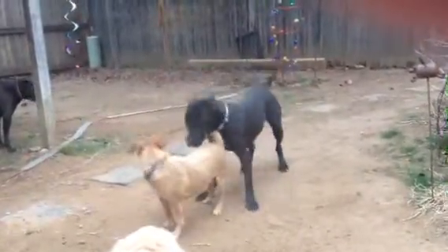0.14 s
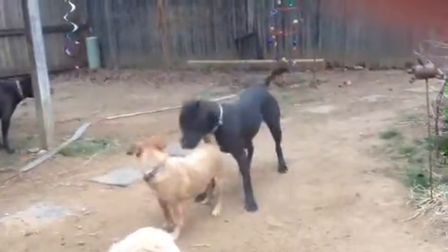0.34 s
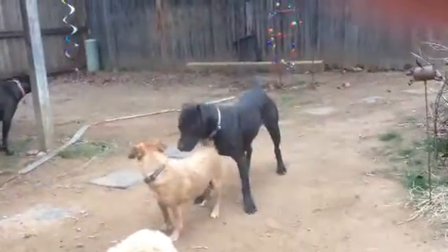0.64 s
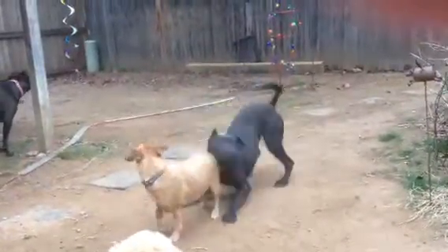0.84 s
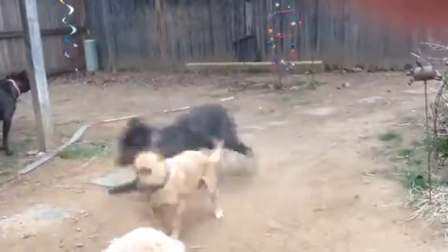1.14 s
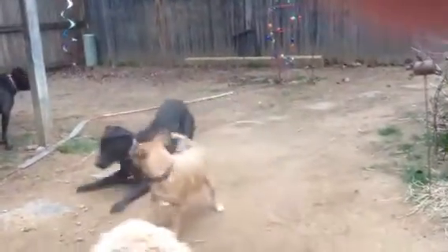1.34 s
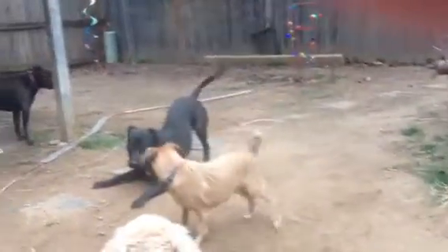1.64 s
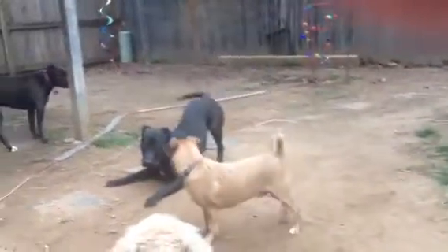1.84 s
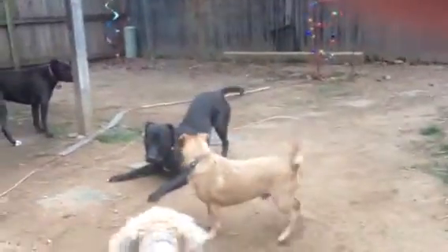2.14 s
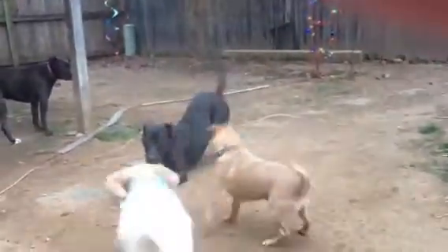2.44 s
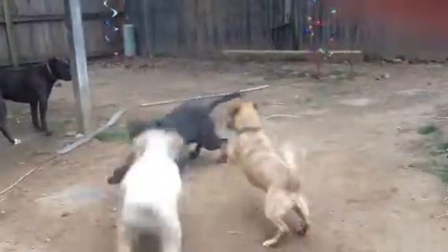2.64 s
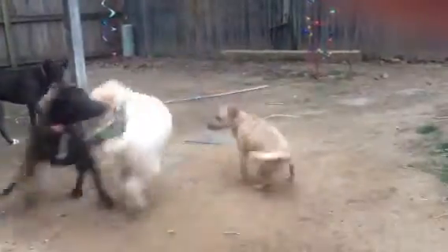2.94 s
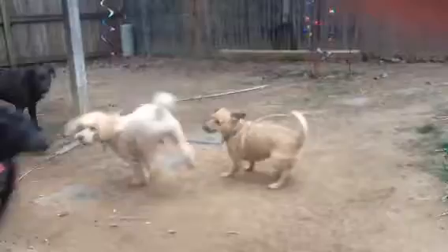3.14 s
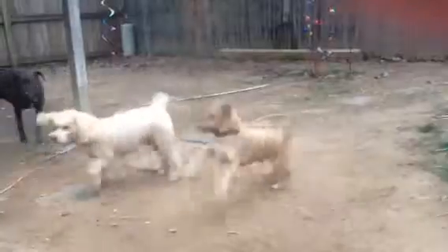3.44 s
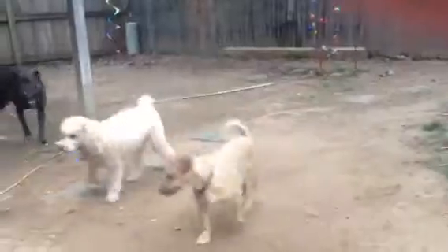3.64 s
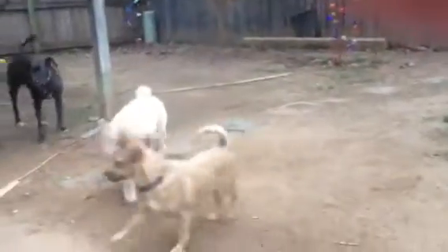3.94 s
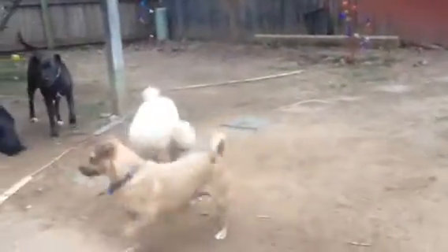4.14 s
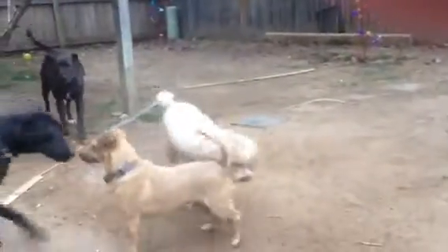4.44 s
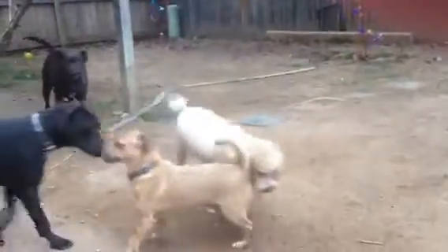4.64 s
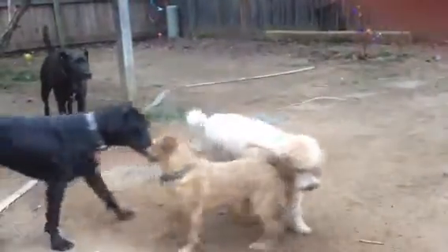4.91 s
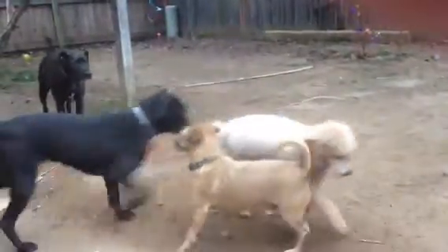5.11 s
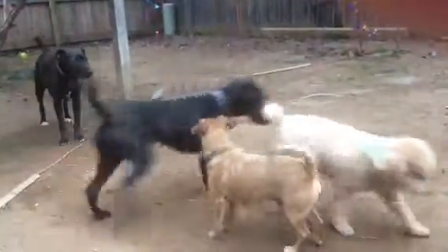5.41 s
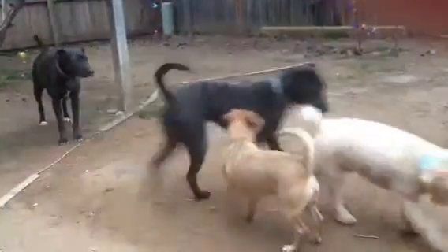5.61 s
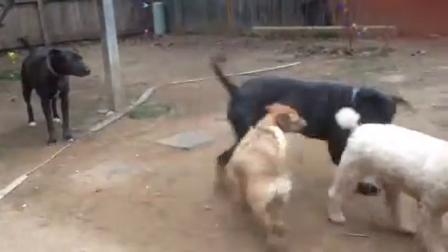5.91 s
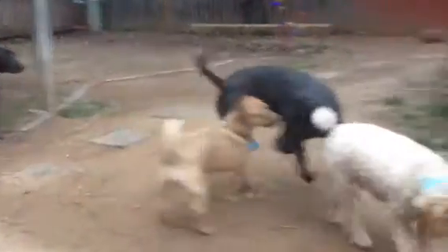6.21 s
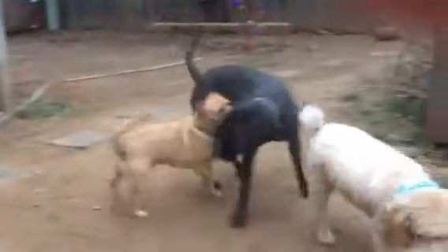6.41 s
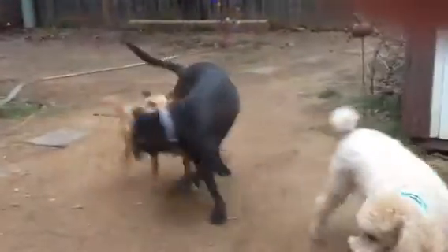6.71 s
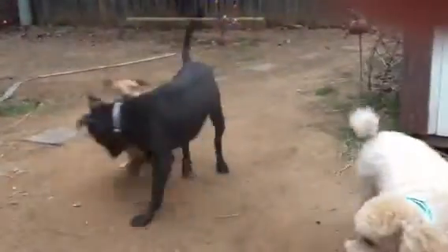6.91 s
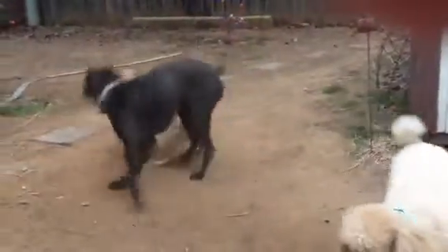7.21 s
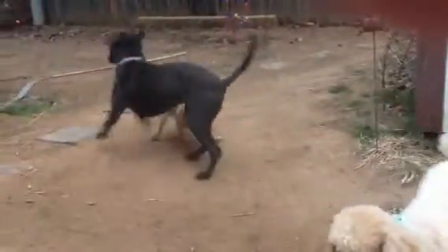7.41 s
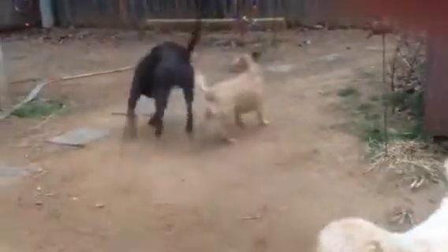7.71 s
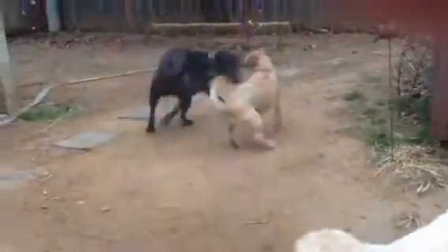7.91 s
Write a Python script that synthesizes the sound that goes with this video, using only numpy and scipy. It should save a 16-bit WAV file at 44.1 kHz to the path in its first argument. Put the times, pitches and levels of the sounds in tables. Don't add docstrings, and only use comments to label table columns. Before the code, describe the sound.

Outdoors in a fenced dirt yard, faint far traffic and a low mains hum lie beneath everything. From 0 to 2 s paws scrape the dry ground in short gritty bursts, with small thuds near 0.8 s and light collar tag ticks. At about 2 s comes a thin nasal whistle, then a small dog's sharp rising yip at 2.2 and wavering whines until 2.65, with soft answering wufs. Scuffling peaks; a big dog huffs and barks once, hoarse and loud, at 2.8-3.0, between two yaps, with heavy landings and bright jingles. Claws snap and tags clink until 3.8. Two high yelps follow at 4.1-4.4. After light scuffs, a hoarse yap over low wufs comes at 5.2-5.35. From 5.8 there are low huffing, faint whistles and a quiet grumble, with scrapes and snaps near 7 and 7.7. Short board echoes follow the calls.

```python
import sys
import numpy as np
from scipy import signal
from scipy.fft import rfft, irfft, next_fast_len
from scipy.io import wavfile
from scipy.ndimage import uniform_filter1d, map_coordinates

SR = 44100
rng = np.random.default_rng(int(sys.argv[2]) if len(sys.argv) > 2 else 0)


def inscribe(sig):
    pcm = np.round(np.clip(np.atleast_2d(sig).T, -1, 1) * 32767)
    wavfile.write(sys.argv[1], SR, pcm.astype(np.int16))


def how_loud(loudness_db):
    steps = np.asarray(loudness_db, float) / 20
    return 10 ** steps


N = 355446
TIME = np.arange(N) / SR

# (frequency [Hz], density [dB per Hz])
TRAFFIC = [(13, -79), (22, -55), (111, -5), (227, -2.5), (268, -6), (334, -6), (427, -14), (849, -11.5),
           (2760, -23), (3440, -30), (4410, -29), (5650, -25.5), (7850, -42.5), (15600, -34.5)]
TRAFFIC_DB = -58
# (frequency [Hz], level [dB])
HUM = [(120, -70), (240, -68)]
# (frequency [Hz], t60 [s])
FENCE_T60 = [(300, 0.24), (1200, 0.54), (3000, 0.46), (6000, 0.28), (12000, 0.69)]
# (frequency [Hz], level [dB])
FENCE_COLOUR = [(500, 2.5), (800, -2.5), (1400, -0.5), (2800, 0.5), (4200, 0.5), (8000, -3)]
# (delay [s], level [dB])
BOARDS = [
    (.005, -8),
    (.013, -7.5),
    (.027, -9.5),
    (.061, -18),
    (.098, -17),
]

# (start [s], hold [s], scrape level [dB], dust over scrape [dB])
SCUFFLE = [(0.076, 0.015, -64, -13), (.715, .03, -68, -14), (0.78, 0.075, -58, -10.5),
           (0.92, 0.073, -53, -11), (1.137, 0.2, -52, -11), (1.253, 0.17, -59.5, -4),
           (2.11, 0.032, -60, -23), (2.363, 0.193, -53.5, -12), (2.638, 0.43, -49.5, -14),
           (3.114, 0.18, -57, -8), (3.307, 0.15, -53.5, -8), (3.549, 0.045, -59, -7),
           (3.656, 0.062, -59.5, -10), (4.07, 0.26, -63, -12), (4.766, 0.1727, -66.5, -6.5),
           (4.947, 0.15, -65.5, -7), (6.054, 0.21, -68, -9.5), (6.422, 0.25, -70, -8.5),
           (6.724, 0.18, -62.5, -11), (7.007, 0.17, -60.5, -10), (7.247, 0.19, -59.5, -5),
           (7.728, 0.04, -49.5, -11.5), (1.65, 0.023, -65.5, -8), (7.984, 0.027, -58, -8.5)]
# (frequency [Hz], density [dB per Hz])
SCRAPE = [(530, -47.5), (900, -19.5), (963, -16.5), (1750, -14), (3860, -9.5), (4160, -7), (4540, -12.5),
          (5450, 1.5), (9000, -28.5), (11700, -56), (19800, -120)]
# (frequency [Hz], density [dB per Hz])
DUST = [(4120, -27), (7000, -18.5), (9060, -11.5), (13300, -6.5), (15100, -10), (15600, -6.5)]
SCUFF_RISE_DB_S, SCUFF_FALL_DB_S, SCUFF_IDLE_DB = 307, 124, -78.5
# (time [s], peak level [dB], frequency [Hz])
SNAPS = [(1.1473, -52, 5500), (2.52, -39, 5160), (3.1638, -31.5, 4164), (3.3251, -32.5, 3060),
         (3.5602, -30, 5670), (4.0756, -39.5, 4190), (4.761, -48.5, 5420), (5.233, -50, 4940),
         (6.2504, -54, 5470), (6.8438, -45, 5320), (7.0028, -29, 4380), (7.0025, -37, 5730),
         (7.011, -44, 4700), (7.018, -42.5, 5460), (7.2515, -41, 5280), (3.215, -40, 5600),
         (1.273, -39, 5600), (7.3842, -35, 5500), (7.7243, -38.5, 5900), (7.9853, -47, 5550),
         (2.463, -37.5, 5900), (2.6345, -27, 2830), (2.635, -28, 4295), (3.296, -42, 3100),
         (3.465, -43.5, 4960), (3.627, -40.5, 5600), (3.6502, -41.5, 5300), (3.7, -47, 6000),
         (3.7405, -36, 4940), (3.768, -49.5, 5350), (4.109, -43, 5620), (5.347, -46, 4900),
         (5.528, -55, 3500)]
SNAP_T60_S = 0.033
# (time [s], peak level [dB], frequency [Hz], t60 [s])
BUCKLE = [
    (1.089, -52, 6600, .15),
    (7.73, -45, 6620, .35),
    (2.666, -38, 6520, .06),
    (3.572, -50, 4800, .2),
    (3.362, -49, 3830, .1),
    (3.345, -46, 2270, .08),
]
# (time [s], peak level [dB], frequency [Hz])
THUDS = [(0.788, -40, 233), (0.915, -44, 166), (2.576, -41.5, 234.7), (2.668, -41.5, 258),
         (2.798, -25.5, 311), (2.97, -32, 311.6), (2.799, -38, 176.9), (2.975, -43, 178),
         (3.36, -41.5, 160), (3.321, -41.5, 270), (4, -54, 228)]

# (frequency [Hz], level [dB], t60 [s])
TAG = [
    (5720, 5, 0.0882),
    (9920, -5.5, 0.045),
    (13220, -7.5, 0.099),
    (14700, -11, 0.15),
]
# (time [s], peak level [dB], struck mode [Hz], low click [dB], ring [dB])
TAG_HITS = [(.768, -52, 9920, -5, -0.5), (0.9263, -53.5, 14700, 0.5, 8), (1.09, -48.5, 13220, -11, -3),
            (1.1174, -44.5, 13220, -12, 4), (1.3682, -43, 13220, -7, -0.5), (2.5868, -42.5, 14700, 4.5, -1),
            (2.6674, -47.5, 13220, 27, -12.5), (2.807, -36, 13220, -0.5, -1), (2.825, -34.5, 14700, 0, 1),
            (2.997, -40.5, 9920, -11.5, 10), (2.9751, -30, 13220, 17.5, 7), (3.0782, -45, 13220, -13, 3.5),
            (3.1356, -40, 9920, -1.5, 1), (3.188, -48.5, 9920, 17, 7), (3.214, -41, 9920, 13, -5.5),
            (3.9787, -44, 13220, 14, -5), (5.576, -48, 14700, 7, -4), (6.7357, -44, 9920, -6, -0.5),
            (7.2497, -49, 13220, 5.5, 5.5), (7.7249, -60, 14700, 5.5, -12), (7.881, -50, 13220, -10, 1)]
# (time [s], peak level [dB], frequency [Hz], low click [dB])
CLINKS = [(1.275, -49, 10500, 23), (1.479, -46.5, 10400, -15), (2.4612, -48, 10800, 25.5),
          (2.6328, -34.5, 15060, 14.5), (2.7633, -39.5, 10230, -3), (2.811, -35, 10980, -1.5),
          (2.82, -32.5, 10240, -8), (2.822, -32, 11710, -8), (2.832, -29.5, 10220, -7),
          (2.834, -31, 14410, -7), (2.765, -40, 11770, -9), (3.018, -40, 13180, -8), (3.34, -40, 12850, 16),
          (3.5646, -35, 10500, 5), (3.65, -46, 10200, 7.5), (3.723, -51, 12000, 3.5),
          (3.7402, -35.5, 11350, -7), (3.9352, -43, 13000, -17.5), (7.002, -63, 10470, 12),
          (7.3622, -38.5, 11770, -6), (7.4934, -48, 13100, -16.5)]
RATTLES_PER_S, RATTLE_DB, RATTLE_WIDTH_HZ = 30, -1, 80

# (peak time [s], rise [s], fall [s], chest level [dB], mouth over chest [dB])
HUFFS = [
    (2.81, 0.036, 0.0048, -32.5, -6),
    (3.346, 0.028, 0.078, -44.5, 2.5),
    (5.799, 0.24, 0.16, -54, -22),
    (7.169, 0.48, 0.77, -63, -9.5),
]
# (frequency [Hz], width [Hz], level [dB])
HUFF_THROAT = [
    [(356.7, 170, -1.5), (189, 61, -2)],
    [(624, 90, 5.5), (966, 114.5, 5.5), (2214, 200, 6)],
]
HUFF_EDGE_DB = -6

# (time [s], effort [dB])
BARK = [
    (2.774, -55.5),
    (2.814, -25),
    (2.84, -16.5),
    (2.858, -12),
    (2.901, -16),
    (2.941, -17.5),
    (2.971, -28),
    (3.005, -39.5),
    (3.03, -53),
]
# (frequency [Hz], width [Hz], level [dB])
BARK_THROAT = [
    [(777.5, 32.3, 8.5), (650, 130, -15)],
    [(1388, 150, 4.5), (1690, 190, -11)],
    [(1037, 100, 6.5), (1190, 166, 5)],
    [(2212, 530, 16.5), (2800, 1300, 3)],
    [(3560, 440, 11), (5100, 1000, 11), (5900, 390, 17), (14490, 1900, 0)],
]
# (level at peak [dB], slope [dB per s])
BARK_SHUTS = [
    (1, 12.5),
    (-5.5, -91),
    (-5, -24),
    (-9, -23.5),
    (-14, -260),
]
BARK_GLIDE = [0, -1.1, -1.4, -1.3, 0.14]
BARK_PEAK_S = 2.8614

# (start [s], length [s], pitch [Hz], level [dB])
WUFS = [
    (2.381, .1, 740, -35.5),
    (2.631, .07, 638, -50.5),
    (5.2, 0.15, 960, -44.5),
    (5.25, .085, 650, -47),
]
WUF_RISE, WUF_HOLD = 0.26, 0.4
WUF_SAG, WUF_START_DB, WUF_END_DB, WUF_MOUTH_DB = 0.93, -13.5, -11.5, -13.5

# (start [s], length [s], top [Hz], level [dB])
WHISTLES = [
    (2.02, .11, 3520, -72),
    (3.56, .24, 3490, -71),
    (5.93, .33, 3500, -67),
    (6.62, .31, 3510, -66),
]
ARCH_TOP, ARCH_START, ARCH_END, ARCH_DB = 0.35, 0.95, 0.94, -7
# (time [s], frequency [Hz], level [dB])
SECOND = [
    (4.094, 2030, -54),
    (4.108, 2190, -33.5),
    (4.135, 2043, -40),
    (4.158, 1880, -36),
    (4.185, 1893, -47),
]

# (time [s], pitch [Hz], level [dB], mouth opening [dB], cycle alternation [dB])
YIP = [
    (2.174, 1096, -50, -8.5, -35),
    (2.19, 1380, -39.5, 5, -40),
    (2.207, 1520, -28.5, -2.5, -50),
    (2.232, 1606, -23.5, -21, -47),
    (2.278, 1647, -34.5, -22, -57),
]
WHINE_UP = [
    (2.284, 1068, -45.5, -26, -25.5),
    (2.306, 937, -40, -8.5, -34),
    (2.336, 1128, -37, -2, -33.5),
    (2.385, 1227, -32, -12, -15),
    (2.405, 1283, -24, -18.5, -15),
    (2.445, 1296, -34.5, -24, -9),
    (2.463, 1179, -33.5, -14.5, -20.5),
]
WHINE_ON = [
    (2.464, 1101, -27.5, -13.5, -28.5),
    (2.495, 977.4, -34, -22, -32),
    (2.523, 997, -39, -29.5, -33.5),
    (2.552, 1090, -20.5, -31, -37),
    (2.562, 1169, -35, -8.5, -34.5),
    (2.6, 1248, -29, -16, -37.5),
    (2.621, 1163, -31.5, -13.5, -34.5),
    (2.632, 972, -41.5, -17.5, -27),
    (2.66, 617, -52, -30.5, -19),
]
YAP_IN = [
    (2.765, 1200, -48.5, -8, -16),
    (2.784, 1376, -47.5, 0.5, -18),
    (2.8, 1475, -28.5, -13.5, -9.5),
]
YAP_OUT = [
    (2.985, 1200, -36, -10, -9.5),
    (3.016, 1260, -22.5, -14, -15),
    (3.045, 1300, -43, -10.5, -14),
]
YELP = [
    (4.082, 761, -32.5, -28, -30),
    (4.096, 1000, -36, -16, -35),
    (4.106, 1130, -34.5, -4, -30),
    (4.119, 1248, -29, -6.5, -29),
    (4.147, 1349, -23, -16.5, -17),
    (4.171, 1325, -37, -16, -19),
    (4.192, 1316, -34, -27, -26),
    (4.22, 850, -40, -22, -28),
    (4.244, 775, -47, -19, -25),
]
YELP_AGAIN = [
    (4.252, 821, -41, -20, -23),
    (4.284, 1039, -34, -16, -46),
    (4.322, 1190, -23.5, -27.5, -25.5),
    (4.344, 1275, -33, -22, -4),
    (4.381, 1092, -33.5, -32, -28),
    (4.391, 1052, -38, -20, -20),
]
YAP = [
    (5.232, 743, -57, -24, -12),
    (5.258, 1011, -46.5, -7, -7.5),
    (5.285, 1282, -32, -14.5, -1),
    (5.305, 1386, -28, -11, -13.5),
    (5.327, 1394, -26, -9.5, -34),
    (5.345, 1398, -40, 9, -33),
]
# (time [s], roughness [0-1])
ROUGH = [(2.17, .4), (2.2, .42), (2.23, .08), (2.3, .18), (2.42, .3), (2.5, .15), (2.6, .3), (2.8, .5),
         (3.0, .3), (4.08, .3), (4.13, .3), (4.17, .6), (4.26, .45), (4.31, .15), (4.36, .5), (5.24, .9),
         (5.285, .7), (5.31, .28)]
# (overtone frequency [Hz], level [dB])
MUZZLE = [(1500, 0), (2750, 4), (3150, -8.5), (3500, -14), (4000, -11), (5400, -9.5), (6300, -24.5),
          (15000, -49)]
DULL_DB, FULL_DB = 1.33, -30
ODD_DB = -4.5

def unit(x):
    return x / np.sqrt(np.mean(x ** 2) + 1e-20)


def along(points, hz):
    f, v = np.transpose(points)
    return np.interp(np.log(hz + 1), np.log(f + 1), v)


def curves(tables, fade_s=.004):
    s, *cols = np.vstack(tables).T
    gate = 0
    for rows in tables:
        inside_s = np.minimum(TIME - rows[0][0], rows[-1][0] - TIME)
        gate = gate + np.clip(inside_s / fade_s + .5, 0, 1)
    return [np.minimum(gate, 1)] + [uniform_filter1d(np.interp(TIME, s, c), size=300) for c in cols]


def wobble(rate_hz):
    knots = rng.standard_normal(int(N * rate_hz / SR) + 4)
    coarse = TIME[::16]
    return np.interp(TIME, coarse, map_coordinates(knots, [coarse * rate_hz]))


def filtered(x, response):
    m = next_fast_len(N + 8192)
    return irfft(rfft(x, m) * response(np.fft.rfftfreq(m, 1 / SR)), m)[:N]


def modes(peaks):
    def response(f):
        total = 0
        for k, (c, w, db) in enumerate(peaks):
            total = total + (-1) ** k * how_loud(db) * 1j * f * w / (c * c - f * f + 1j * f * w)
        return total
    return response


def noise(spectrum, patchy_db, grit_db):
    grit = rng.exponential(size=N // 32 + 1).repeat(32)[:N]
    raw = rng.standard_normal(N) * how_loud(grit_db * grit)
    z = signal.stft(raw, nperseg=512)[2]
    patches = uniform_filter1d(uniform_filter1d(rng.standard_normal(z.shape), 8, 0), 8, 1)
    patchy = signal.istft(z * how_loud(patchy_db * unit(patches)), nperseg=512)[1][:N]
    return unit(filtered(patchy, lambda hz: how_loud(along(spectrum, hz))))


def add(out, s, sound):
    part = out[round(s * SR):][:len(sound)]
    part += sound[:len(part)]


def yard():
    hum = 0
    for hz, db in HUM:
        hum = hum + 1.37 * how_loud(db + 0.83 * wobble(16.0)) * np.sin(2 * np.pi * hz * TIME)
    traffic = noise(TRAFFIC, patchy_db=1.0, grit_db=-1.5)
    return how_loud(TRAFFIC_DB + 0.27 * wobble(11.0)) * traffic + hum


def fences(x):
    hz, t, z = signal.stft(rng.standard_normal(SR), SR, nperseg=256)
    decay_db = along(FENCE_COLOUR, hz)[:, None] - 60 * t / along(FENCE_T60, hz)[:, None]
    tail = signal.istft(z * how_loud(decay_db), SR, nperseg=256)[1]
    tail = np.pad(how_loud(-2.5) * tail / np.linalg.norm(tail), (900, 0))
    for k, (s, db) in enumerate(BOARDS):
        tail[round(s * SR)] += (-1) ** k * how_loud(db)
    return signal.fftconvolve(x, tail)[:N]


def scuffs():
    s, hold, db, dust_db = np.transpose(SCUFFLE)[..., None]
    t = TIME[::64]
    rise_db = SCUFF_RISE_DB_S * np.maximum(s - t, 0)
    fall_db = SCUFF_FALL_DB_S * np.maximum(t - s - hold, 0)
    each_db = db - rise_db - fall_db
    gains = []
    for over_db, idle in [(0, 1), (dust_db, .25)]:
        scuffing = np.linalg.norm(how_loud(each_db + over_db), axis=0)
        gains.append(np.interp(TIME, t, np.hypot(scuffing, how_loud(SCUFF_IDLE_DB) * idle)))
    return gains


def rattle(stir):
    touches = (rng.random(N) < RATTLES_PER_S / SR) * rng.standard_normal(N)
    tag = modes([(hz, RATTLE_WIDTH_HZ, db) for hz, db, _ in TAG])
    return how_loud(RATTLE_DB) * stir * unit(filtered(touches, tag))


def snaps(out):
    t = np.arange(SR // 3) / SR
    for s, db, hz, t60 in [(*row, SNAP_T60_S) for row in SNAPS] + BUCKLE:
        band = signal.butter(3, [.8 * hz, 1.45 * hz], "band", fs=SR)
        crack = how_loud(6 - 60 * t / .04) * signal.lfilter(*band, rng.standard_normal(len(t)))
        tone = .7 * np.sin(2 * np.pi * hz * t)
        add(out, s, how_loud(db - 3 - 60 * t / t60) * (tone + crack))


def thuds(out):
    t = np.arange(SR // 3) / SR
    push = how_loud(-60 * t / 0.14) * (1 - np.exp(-t / 0.0034))
    for s, db, hz in THUDS:
        add(out, s, how_loud(db) * push * np.sin(2 * np.pi * hz * t))


def paws():
    scrape, dust = scuffs()
    stir = how_loud(2 * wobble(25))
    out = stir * scrape * how_loud(1.5) * noise(SCRAPE, patchy_db=2, grit_db=2.0)
    out += stir * dust * how_loud(1.1) * noise(DUST, patchy_db=1.5, grit_db=2.2)
    out += rattle(dust)
    snaps(out)
    thuds(out)
    return out


def tag_ring(t, struck_hz):
    ring = 0
    for f, level_db, t60 in TAG:
        scatter, beat = rng.standard_normal(2)
        far_db = 6 * (abs(struck_hz / f - 1) > .08)
        decay = how_loud(level_db + 3 * scatter - 60 * t / t60 - far_db)
        ring = ring + decay * np.sin(2 * np.pi * f * t) * np.cos(2 * np.pi * 14 * beat * t)
    return ring


def collars():
    out, t = np.zeros(N), np.arange(SR // 5) / SR
    click_band = signal.butter(1, [3800, 7000], "band", fs=SR)
    for s, db, hz, low_db, *ring_db in TAG_HITS + CLINKS:
        if ring_db:
            ring = how_loud(ring_db[0]) * tag_ring(t, hz)
        else:
            ring = 2 * how_loud(-13 - 60 * t / 0.0437) * np.sin(2 * np.pi * hz * t)
        crack = how_loud(-9 - 60 * t / .012) * np.diff(rng.standard_normal(len(t)), prepend=0)
        click = signal.lfilter(*click_band, rng.standard_normal(len(t)))
        low = how_loud(low_db - 8.0 - 60 * t / 0.014) * click
        add(out, s, how_loud(db) * (ring + crack + low))
    return out


def hoarse(tables, throat, pitch_hz, jitter, share, glide):
    gate, *levels = curves(tables)
    turns = np.cumsum(pitch_hz * (1 + jitter * wobble(300))) / SR
    pulses = np.diff(np.floor(turns), prepend=0) * how_loud(2.2 * rng.standard_normal(N))
    puffs = rng.standard_normal(N) * (2.1 + np.cos(2 * np.pi * turns))
    since_s = np.clip(TIME - BARK_PEAK_S - .03, -.2, .2)
    out = 0
    for k, (db, peaks) in enumerate(zip(levels, throat)):
        mix = np.clip(share + .12 * k, 0, 1)
        source = (1 - mix) * unit(pulses) + mix * unit(puffs)
        group = modes(peaks)
        skirt = modes([(peaks[0][0], .9 * peaks[0][0], 0)])
        ringing = unit(filtered(source, lambda f: group(f) * skirt(f)))
        warped_s = TIME + glide[k] / 2 * since_s ** 2
        gain = how_loud(db + 2.6 * np.clip(wobble(45), -2, 1))
        out = out + gain * np.interp(warped_s, TIME, ringing)
    return gate * out


def huffs():
    tables = []
    for s, rise, fall, db, mouth_db in HUFFS:
        shape = [(-rise, HUFF_EDGE_DB), (0, 0), (fall, 2 * HUFF_EDGE_DB)]
        tables.append([(s + at, db + drop, db + drop + mouth_db) for at, drop in shape])
    return hoarse(tables, HUFF_THROAT, pitch_hz=305, jitter=.07, share=.45, glide=[0, 0])


def bark():
    table = []
    for s, db in BARK:
        table.append((s, *[db + over + slope * (s - BARK_PEAK_S) for over, slope in BARK_SHUTS]))
    return hoarse([table], BARK_THROAT, pitch_hz=383.0, jitter=0.08, share=0.65, glide=BARK_GLIDE)


def voice(tables, breath_db, jitter, flutter_db, count):
    gate, hz, first, mouth, split = curves(tables)
    second, half = first + mouth, first + split
    rough = np.interp(TIME, *np.transpose(ROUGH))
    shaken_hz = hz * (1 + jitter * rough * (wobble(1100) + 0.097 * wobble(60)))
    phase = 2 * np.pi * np.cumsum(shaken_hz) / SR

    def partial(k, db):
        flutter = flutter_db * (0.54 + rough) * np.sqrt(k) * np.clip(wobble(70), -1.3, 1)
        return how_loud(db + flutter) * np.sin(k * phase + k * k)

    tone = partial(1, first) + partial(.5, half)
    dull_db = DULL_DB * np.minimum(first - FULL_DB, 0)
    for k in range(2, count):
        tone += partial(k, second + along(MUZZLE, k * hz) + (k - 2) * dull_db)
        tone += partial(k - .5, half + ODD_DB + along(MUZZLE, (k - .5) * hz))
    shake = 1 + 0.4 * rough * wobble(600)
    breath = noise([(480, -40), (750, -2)] + MUZZLE[1:], patchy_db=3, grit_db=0) * (1 + np.cos(phase))
    breath_gain = rough * how_loud(breath_db) * np.hypot(how_loud(first - 9), how_loud(second))
    return gate * (np.sqrt(2) * tone * shake + breath_gain * breath)


def wufs():
    shape = [(0, 1, WUF_START_DB), (WUF_RISE, 1, 0), (WUF_HOLD, 1, 0), (1, WUF_SAG, WUF_END_DB)]
    tables = []
    for s, long, hz, db in WUFS:
        tables.append([(s + u * long, hz * bend, db + drop, WUF_MOUTH_DB, -40) for u, bend, drop in shape])
    return voice(tables, breath_db=-6, jitter=.08, flutter_db=1.5, count=5)


def whistle():
    arch = [(0, ARCH_START, ARCH_DB), (ARCH_TOP, 1, 0), (1, ARCH_END, ARCH_DB / 2)]
    tables = []
    for s, long, top_hz, level_db in WHISTLES:
        tables.append([(s + u * long, top_hz * bend, level_db + drop) for u, bend, drop in arch])
    gate, hz, db = curves(tables, fade_s=0.044)
    phase = 2 * np.pi * np.cumsum(hz * (1 + .018 * wobble(200))) / SR
    return gate * how_loud(db - 1 + 4 * wobble(60)) * (np.sin(phase) + .5 * np.sin(1.76 * phase))


def squeal():
    gate, hz, db = curves([SECOND])
    phase = 2 * np.pi * np.cumsum(hz * (1 + .04 * wobble(700))) / SR
    return gate * how_loud(db + 3 + 3 * wobble(90)) * np.sin(phase)


def yelps():
    calls = [YIP, WHINE_UP, WHINE_ON, YAP_IN, YAP_OUT, YELP, YELP_AGAIN, YAP]
    return voice(calls, breath_db=-3, jitter=.085, flutter_db=4.5, count=8)


def scene():
    dogs = yelps() + wufs() + whistle() + squeal()
    dogs = filtered(dogs, lambda f: -f * f / (620 ** 2 - f * f + 1j * f * 560))
    dogs += bark() + huffs()
    dogs = filtered(dogs, lambda f: (1j * f / (160 + 1j * f)) ** 3)
    small = collars() + paws()
    echoes = fences(how_loud(-8.5) * dogs + how_loud(-13.0) * small)
    return (how_loud(-1.0) * dogs + small + echoes + yard())[None]


def roll_off(x):
    return signal.sosfilt(signal.butter(12, 16500, fs=SR, output="sos"), x)


def record(dry):
    soft = dry[0] / (1 + np.abs(dry[0] / .95) ** 4) ** .25
    top_hz = 15250
    mix = filtered(soft, lambda hz: how_loud(-26 * np.clip((hz - top_hz) / 200, 0, 1)))
    return roll_off(mix[None])


dry = scene()
out = record(dry)
inscribe(out)
```